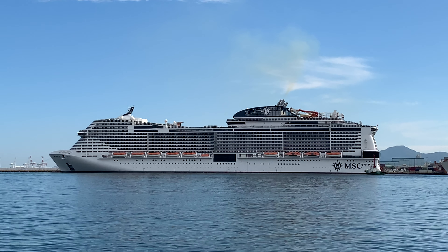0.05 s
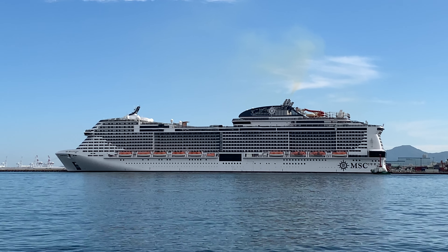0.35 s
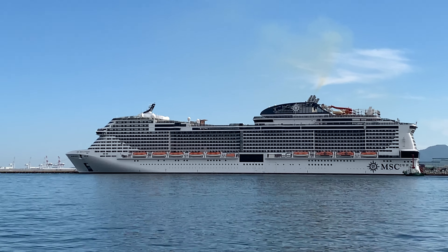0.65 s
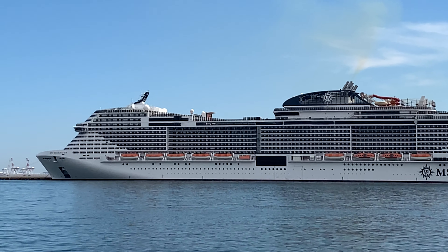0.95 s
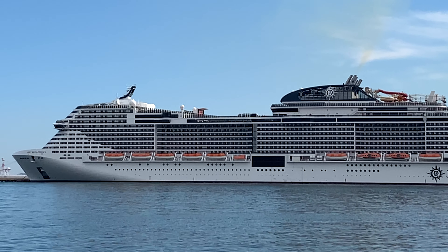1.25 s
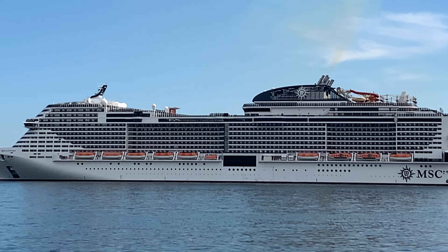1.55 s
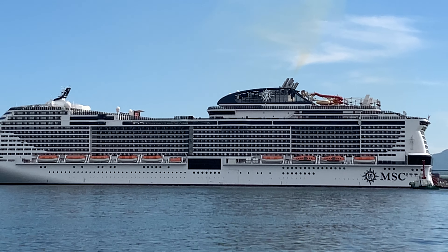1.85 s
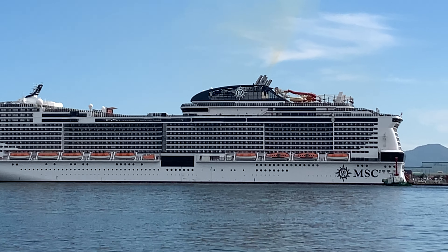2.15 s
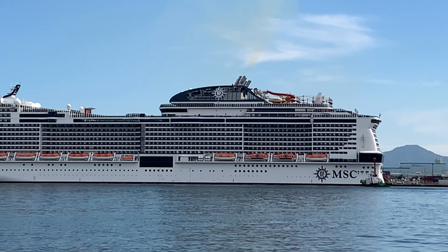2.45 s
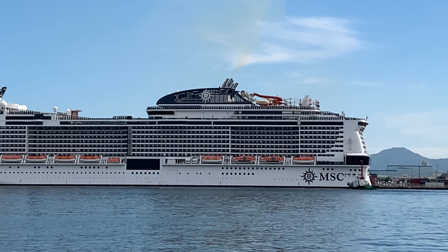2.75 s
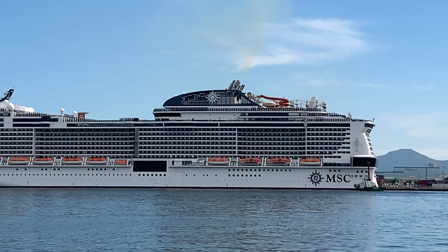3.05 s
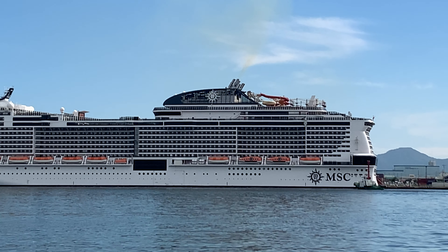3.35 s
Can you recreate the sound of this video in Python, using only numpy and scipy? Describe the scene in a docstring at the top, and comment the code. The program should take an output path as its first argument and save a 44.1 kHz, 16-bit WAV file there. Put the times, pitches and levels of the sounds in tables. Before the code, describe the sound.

Throughout, a large ship's diesel generators and fans drone across a calm harbour, heard on a phone from the far quay. Its low exhaust rumble throbs irregularly and is the main sound, with a deep hum that is strong at first and sinks within a second. Breeze and distant town add a soft, even roar and hiss. At about 0.9 seconds a far gull gives a thin rising cry, and wavelets start lapping, with a few bubbly plips until 1.7 seconds. The breeze freshens briefly around 1.6 seconds. Scattered light laps follow, notably near 3.3 seconds. Two fainter, overlapping gull cries come near 4 seconds. On the right, over a faint steady high hiss, a cicada rasps in runs of about five pulses a second, loudest near 5.6 seconds. The rumble gives its strongest throb at 6.4 seconds and carries on to the end, near 7 seconds.

```python
"""A cruise ship lies across a calm harbour, heard from the far quay on a phone. From the start its diesel
generators and fans drone over an exhaust rumble, the low drone throbbing now and then, breeze and town give a
soft roar and hiss, and a cicada rasps in pulses on the right over a steady high hiss. Near 1 s a far gull calls
and wavelets begin to lap, ringing with bubbles; the breeze then freshens briefly. Two more cries come near 4 s,
the cicada is loudest near 5.6 s, and the low drone gives its strongest throb at 6.4 s."""
import sys
import numpy as np
from scipy import signal
from scipy.fft import rfft, irfft
from scipy.io import wavfile
from scipy.ndimage import map_coordinates

SR = 44100
rng = np.random.default_rng(int(sys.argv[2]) if len(sys.argv) > 2 else 0)


def put_to_file(sound):
    """Save the sound as 16-bit audio at rate SR, in the file named by the first command-line argument."""
    columns = np.atleast_2d(sound).T  # one column per channel
    safe = np.clip(columns, -1, 1)
    whole_steps = np.round(safe * 32767)
    wavfile.write(sys.argv[1], SR, whole_steps.astype(np.int16))


N = 308700
T = np.arange(N) / SR
FREQ = np.maximum(np.arange(N // 2 + 1) * SR / N, 1)


def undb(db):
    """Decibels to amplitude ratio."""
    return 10 ** (np.asarray(db) / 20)


def pan(db):
    """Left and right gains for a level difference; positive is to the left."""
    return undb(np.array([[db], [-db]]) / 2)


def add(out, s, sound):
    """Superpose a short sound at time s."""
    span = out[:, int(s * SR):][:, :sound.shape[-1]]
    span += sound[..., :span.shape[1]]


def bump(s, width_s):
    """Gaussian envelope centred on time s."""
    return np.exp(-.5 * ((T - s) / width_s) ** 2)


def walk(rate):
    """Smooth random modulation of spread near 1, with rate new values a second."""
    knots = rng.standard_normal(512)
    coarse = map_coordinates(knots, [T[::100] * rate], order=3, mode="wrap")
    return np.interp(T, T[::100], coarse)


def colour(spectrum):
    """Spectral shaping: the gain from unit white noise to a given density, steep past its ends."""
    hz, db = np.transpose(spectrum)
    octaves_outside = np.abs(np.log2(FREQ / np.clip(FREQ, hz[0], hz[-1])))
    return undb(np.interp(np.log(FREQ), np.log(hz), db) - 20 * octaves_outside) * np.sqrt(SR / 2)


def wash(spectrum, coherence, turn_rad=0, lag_ms=0):
    """Partly coherent noise at two microphone ports, the left behind by a phase turn and a delay."""
    shared, left, right = rfft(rng.standard_normal((3, N)))
    behind = np.exp(-1j * (turn_rad + 2 * np.pi * FREQ * lag_ms / 1000))
    coherent = np.sqrt(coherence) * np.array([shared * behind, shared])
    diffuse = np.sqrt(1 - coherence) * np.array([left, right])
    return irfft((coherent + diffuse) * colour(spectrum), N)


def shimmer(x, spread_db, rate, per_octave):
    """Random amplitude modulation: each band of a sound wavers on its own."""
    hz, s, spectra = signal.stft(x, SR, nperseg=512)
    grid = np.meshgrid(per_octave * np.log2(1 + hz / hz[1]), rate * s, indexing="ij")
    field = map_coordinates(rng.standard_normal((64, 512)), grid, order=3, mode="wrap")
    return signal.istft(spectra * undb(spread_db * field), SR)[1][:, :N]


def scatter(x, t60_s, wet):
    """Reverberation: echoes from hull and quays follow the direct sound, decaying exponentially."""
    t = T[:32768]
    tail = rng.standard_normal((2, len(t))) * np.exp(-np.log(1000) * t / t60_s)
    tail /= np.sqrt(np.sum(tail ** 2, axis=1, keepdims=True))
    echoes = signal.fftconvolve(np.atleast_2d(x), tail, axes=1)[:, :N]
    return np.sqrt(1 - wet) * x + np.sqrt(wet) * echoes


def shore():
    """Broadband roar and hiss of breeze and town, whose coherence at the ports varies with frequency."""
    # noise spectra: (frequency [Hz], density [dB per Hz])
    roar_spectrum = [(100, -91), (220, -78), (420, -80.5), (600, -79.5), (850, -71), (1100, -75),
                     (1400, -83.3), (1800, -88.5), (2600, -108)]
    hiss_spectrum = [(1000, -105), (2050, -90.5), (2370, -84), (2600, -86.5), (2950, -87), (3300, -84.5),
                     (3950, -88), (4800, -85.5), (5250, -89), (6000, -96), (6400, -102.5), (6800, -106),
                     (7800, -107.5), (8500, -112), (9400, -116), (10400, -123), (15000, -125.5)]
    # the breeze's swing, taken about each level's mean: (time [s], roar level [dB], hiss level [dB])
    breeze = [(0, -1, 2), (1.1, -1.3, 2), (1.6, 1, 3), (2.05, -0.5, 1.6), (2.8, -0.5, 1), (4.2, -1, 1.3),
              (5, -1, 1.5), (7, -1, 2.1)]
    # sound field at the two ports: (frequency [Hz], coherence [0-1], phase turn [rad])
    ports = [(250, .75, 2.2), (600, .8, 1.3), (850, .92, .65), (1250, .83, -.25), (1550, .66, -.6),
             (2000, .3, -.5), (2200, .35, -1.5), (2450, .6, -1.2), (2900, .38, -1.3), (3200, .52, .3),
             (3700, .48, -.1), (4000, .42, .5), (5300, .56, .4), (5900, .25, -2.4)]
    times, *levels = np.transpose(breeze)
    roar_db, hiss_db = (np.interp(T, times, db - db.mean()) for db in levels)
    hz, *columns = np.transpose(ports)
    coherence, turn = (np.interp(FREQ, hz, column) for column in columns)
    roar = wash(roar_spectrum, coherence, turn, lag_ms=.44) * undb(roar_db + 0.13 * walk(6.1))
    hiss = wash(hiss_spectrum, coherence, turn, lag_ms=.44) * undb(hiss_db + 0.19 * walk(12))
    return shimmer(roar * pan(db=-1.5) + hiss * pan(db=.5), spread_db=1.09, rate=9, per_octave=6)


def high_hiss():
    """Band-limited noise: a steady high hiss on the right, its spectrum stepping up abruptly at 8 kHz."""
    # the hiss band: (frequency [Hz], density [dB per Hz])
    spectrum = [(6000, -114), (7900, -115), (8030, -102), (8800, -108.5), (9500, -117), (10200, -132)]
    hiss = wash(spectrum, coherence=.75, lag_ms=.38) * pan(db=-9)
    return shimmer(hiss, spread_db=1.2, rate=15, per_octave=8.8)


def gull():
    """Frequency glides: thin rising cries from so far off that only the lowest partial carries."""
    # cries: (time [s], length [s], first pitch [Hz], last pitch [Hz], level [dB])
    calls = [(0.885, 0.29, 970, 1122, -54.5), (3.867, 0.28, 1200, 1443, -58.5),
             (3.982, 0.42, 1036, 1170, -59)]
    out = 0
    for s, length, first_hz, last_hz, db in calls:
        progress = np.clip((T - s) / length, 0, 1)
        hz = first_hz + (last_hz - first_hz) * np.sin(np.pi / 2 * progress)
        hz *= 1 + .022 * walk(70)  # jitter roughens the voice
        out += undb(db) * np.sin(np.pi * progress) * np.sin(2 * np.pi * np.cumsum(hz) / SR)
    return scatter(out, t60_s=.4, wet=0.28)


def bubble(hz, ring_s, glide=0.081, size=2048):
    """Damped resonance: a bubble starts softly, rings down 40 dB in ring_s and rises in pitch."""
    t = T[:size]
    age = t / ring_s
    envelope = (1 - np.exp(-(t * hz) ** 2)) * np.exp(-np.log(100) * age)
    return envelope * np.sin(2 * np.pi * hz * t * (1 + glide * age))


def water(count=320, ring_cycles=7):
    """Air entrainment: each wavelet breaks into a cloud of ringing bubbles; a few plip singly."""
    # wavelets: (time [s], level [dB], centre pitch [Hz], fade [s], pitch spread [natural log])
    laps = [(0.941, -62, 1140, 0.03, 0.19), (.99, -57, 2370, .028, 0.11), (1.072, -54.5, 1880, 0.04, 0.18),
            (1.08, -52, 900, .028, 0.31), (1.159, -60, 1940, 0.081, 0.35), (1.235, -50, 412, 0.048, 0.28),
            (1.425, -53.5, 1070, 0.036, 0.34), (1.42, -60.5, 2470, 0.14, 0.24),
            (1.61, -53.5, 606, 0.13, 0.24), (1.73, -57.5, 1690, 0.046, 0.34),
            (2.46, -58, 1050, 0.045, 0.082), (3.25, -52.5, 1960, .066, 0.52),
            (3.27, -52.5, 468, 0.11, 0.33), (3.365, -54, 1110, 0.041, 0.18), (4.13, -51, 557, 0.031, 0.3),
            (4.88, -58, 990, 0.036, 0.34), (5.69, -48, 284, 0.06, 0.13)]
    # single bubbles: (time [s], level [dB], pitch [Hz], ring time [s])
    plips = [(1.061, -37.5, 291, 0.18), (1.29, -50, 526, 0.11), (1.325, -40, 413, 0.11),
             (1.545, -43.5, 1980, 0.056)]
    out = np.zeros((2, N))
    for s, db, hz, fade, spread in laps:
        pitch = hz * np.exp(spread * np.clip(rng.standard_normal((count, 1)), -2, 2))
        strength, sides = rng.uniform(0.94, 1, count), rng.uniform(-1, 1, count)
        cloud = strength[:, None] * bubble(pitch, ring_cycles / pitch)
        cloud *= undb(db) * np.sqrt(2 * fade * SR / np.sum(cloud ** 2))
        starts = s - fade * np.log(rng.random(size=(count, 3))).mean(1)  # a soft swell, a longer tail
        for start, side, ring in zip(starts, sides, cloud):
            add(out, start, pan(db=4.5 * side) * ring)
    for s, db, hz, ring_s in plips:
        add(out, s, undb(db) * bubble(hz, ring_s, glide=0.033, size=8192))
    return scatter(out, t60_s=0.082, wet=0.11)


def cicada(period_s=.1835, stray_s=.005, uneven_db=1.5, click_hz=220):
    """Amplitude modulation: a cicada rasps in pulses, each roughened by its tymbal clicks."""
    # its rasp: (frequency [Hz], density [dB per Hz])
    spectrum = [(4000, -111), (4900, -97), (6300, -106.5), (7500, -105.5), (8500, -102.5), (9400, -105),
                (10100, -112.5), (10900, -130)]
    # unbroken runs of pulses: (start [s], end [s])
    runs = [(.09, .35), (1.11, 2.5), (3.59, 6.05), (6.22, 6.9)]
    # how hard it sings: (time [s], level [dB])
    effort = [(0, -10), (1.1, -10), (1.7, -8), (2.8, -10), (3.6, -10), (4.85, -3), (5.6, -.5), (6.25, -3),
              (6.8, -10)]
    power = np.zeros(N)
    for start, end in runs:
        for s in np.arange(start, end, period_s):
            pulse = bump(s + stray_s * rng.standard_normal(), width_s=.032)
            power += pulse * undb(uneven_db * rng.standard_normal())
    envelope = undb(np.interp(T, *np.transpose(effort))) * np.sqrt(power)
    click_rate = click_hz * (1 + 0.052 * walk(33))
    tymbal = 1 + .5 * np.sin(2 * np.pi * np.cumsum(click_rate) / SR)
    return wash(spectrum, coherence=.65, lag_ms=.38) * pan(db=-7) * envelope * tymbal


def drone(hz, db, waver_db, wander_rad, turn_rad):
    """One machine tone, modulated in level and phase by the air over the water."""
    phase = 2 * np.pi * (hz * T + rng.random()) + wander_rad * walk(2.01)
    return np.sqrt(2) * undb(db + waver_db * walk(2.234)) * np.sin([phase - turn_rad, phase])


def generators(cycle_hz=19.45):
    """Harmonic series: the diesels sound at multiples of their cylinder cycle rate."""
    # engine orders: (multiple of the cycle rate, level [dB])
    orders = [(2, -57), (6, -43.5), (9, -52), (12, -57.5), (13, -66.5), (15, -64), (18, -68), (20, -79),
              (21, -71), (22, -65), (23, -65), (24, -70.5), (25, -80.5), (26, -64), (28, -70.5),
              (30, -72.5), (32, -75), (34, -78.5)]
    return sum(drone(n * cycle_hz, db, waver_db=1.0, wander_rad=0.54, turn_rad=0.38) for n, db in orders)


def fans():
    """Beating: the close tones of fans and pumps interfere; one hum starts strong, then sinks."""
    # steady tones: (frequency [Hz], level [dB])
    tones = [(29.3, -70), (35.8, -49.5), (42.5, -59), (48.56, -42), (54.5, -38), (64.56, -40), (70, -40),
             (71.1, -42.5), (73.9, -45), (90.6, -46.5), (95.4, -45)]
    # the sinking hum: (time [s], level [dB])
    fade = [(0, -34.5), (.6, -39.5), (1.15, -47), (7, -44.5)]
    steady = sum(drone(hz, db, waver_db=0.3, wander_rad=0.41, turn_rad=0.26) for hz, db in tones)
    hum_db = np.interp(T, *np.transpose(fade))
    return steady + drone(hz=80.95, db=hum_db, waver_db=4.6, wander_rad=0.29, turn_rad=.35)


def ship(lull_db=-4):
    """Modulation by band: the ship's sound is steady below 56 Hz, throbs up to 96 Hz and wavers above."""
    # exhaust rumble from the funnel: (frequency [Hz], density [dB per Hz])
    rumble = [(20, -89.5), (29, -78), (38, -64.5), (46, -60), (55, -54.5), (68, -51.5), (82, -54.5),
              (108, -59.5), (145, -60), (190, -62), (280, -68.5), (400, -77), (700, -85.5), (1500, -115)]
    # brief throbs of the low band of drone and rumble: (time [s], rise above the lull [dB])
    throbs = [(.09, -1), (.28, 11.5), (.47, 5), (.62, 8), (.77, 9), (2.08, 8.5), (2.33, 8), (2.98, 11),
              (3.32, 9), (3.98, 5), (4.14, 5), (4.35, 6.5), (4.6, 1.5), (5.2, 4), (5.46, 7.5), (6.38, 16)]
    exhaust = wash(rumble, coherence=1.0, turn_rad=0.42)
    sound = exhaust + generators() + fans()
    deep, lows = (irfft(rfft(sound) / (1 + (FREQ / edge_hz) ** 8), N) for edge_hz in (56, 96))
    throb_db = sum(db * bump(s, width_s=0.018) for s, db in throbs)
    body = (lows - deep) * undb(lull_db + throb_db)
    upper = shimmer(sound - lows, spread_db=2.5, rate=12, per_octave=4.985)
    return (deep + body) * pan(db=0.7) + upper * pan(db=-0.4)


def scene():
    """Superposition of all the sources."""
    return ship() + shore() + cicada() + high_hiss() + water() + gull()


def record(dry):
    """Band limiting: the phone cuts the top with a steep low-pass filter."""
    top_hz = 15200
    return signal.sosfilt(signal.ellip(8, .2, 70, top_hz, fs=SR, output="sos"), dry)


dry = scene()
out = record(dry)
put_to_file(out)
```